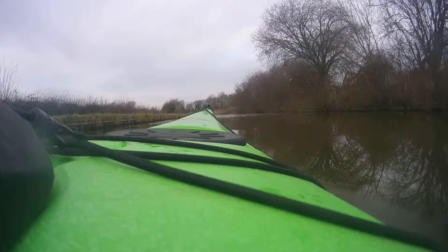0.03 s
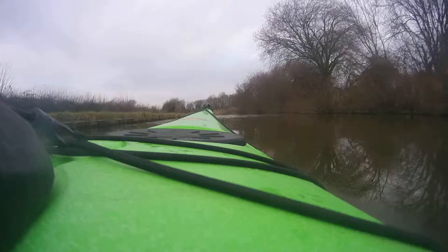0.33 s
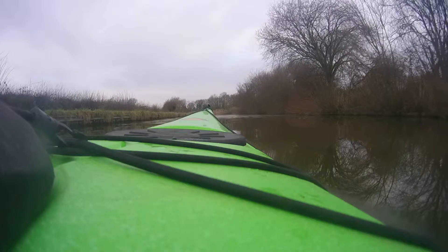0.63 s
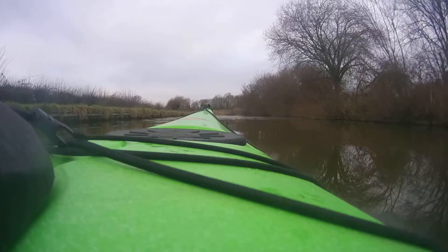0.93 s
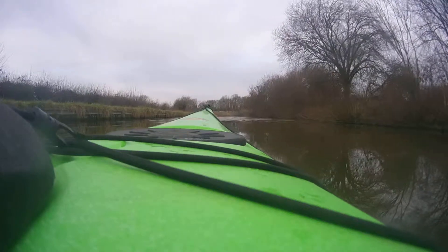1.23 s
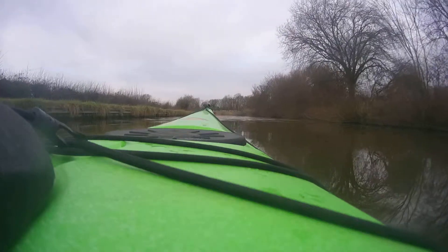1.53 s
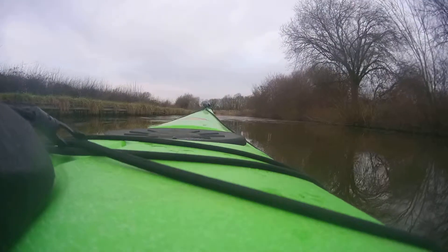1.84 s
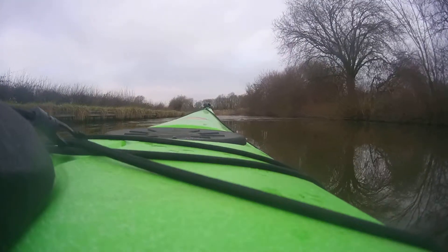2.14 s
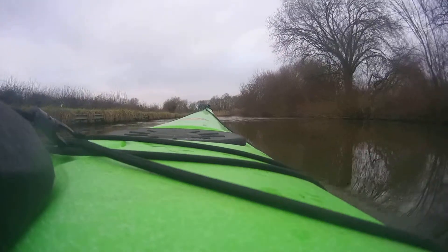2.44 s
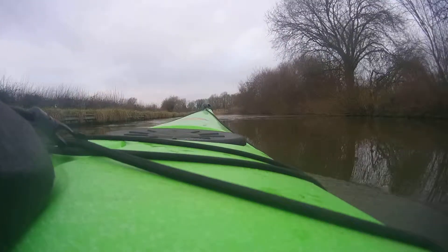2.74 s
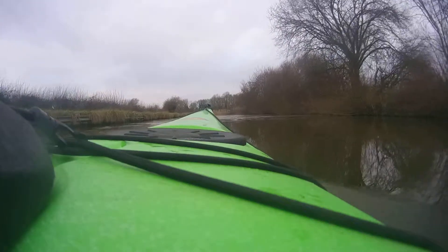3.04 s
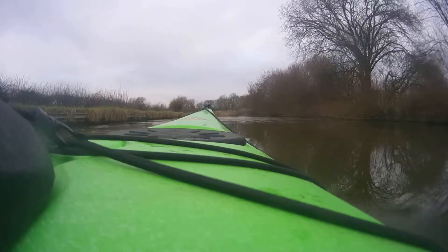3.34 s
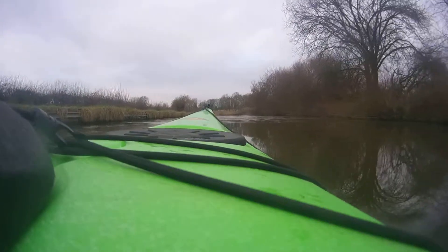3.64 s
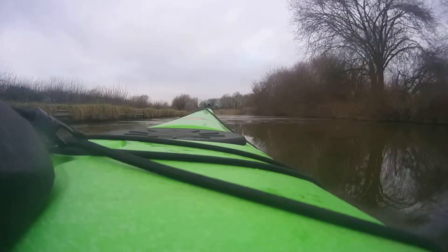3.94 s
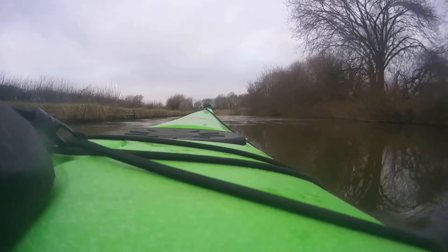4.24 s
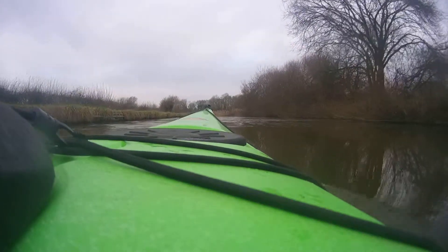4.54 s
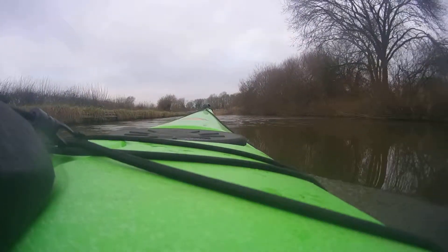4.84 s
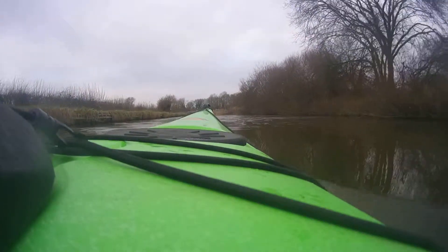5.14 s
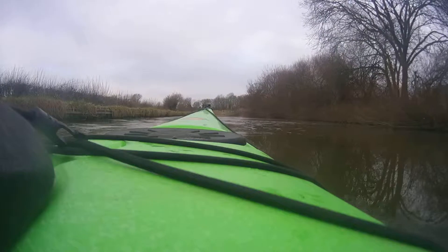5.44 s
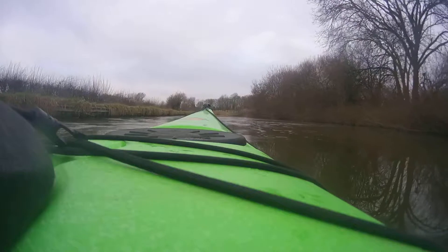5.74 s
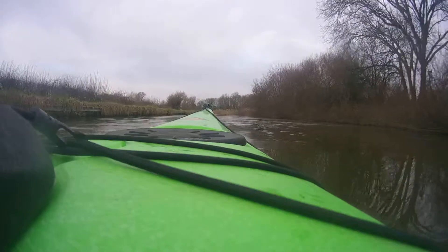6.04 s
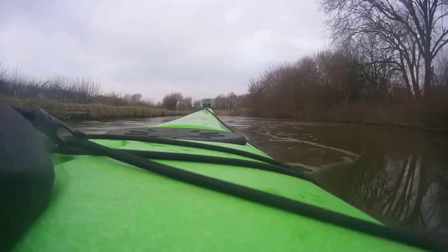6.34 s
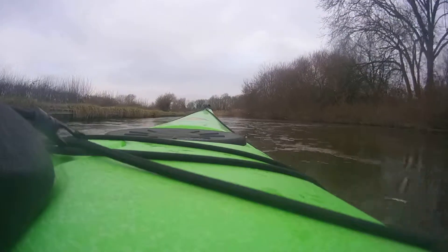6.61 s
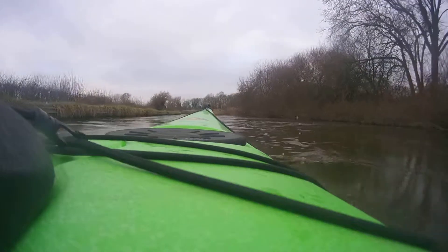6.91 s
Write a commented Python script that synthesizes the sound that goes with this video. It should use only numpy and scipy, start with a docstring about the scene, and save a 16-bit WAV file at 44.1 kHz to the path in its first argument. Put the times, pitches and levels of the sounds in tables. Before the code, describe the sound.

Gentle paddle strokes swish and drip on a calm river until thin ice cracks and crunches against a hollow plastic kayak hull.

```python
"""A calm river, heard close and dry from a small camera on the deck of a plastic kayak.
Water ripples and fizzes along the gliding hull. Drops tick on the surface, trapped air pockets ring,
and five paddle strokes splash in, gurgle and drip. Just after six seconds the bow runs into thin ice:
the sheet snaps crack after crack, shards crunch along the sides and the hollow hull drums."""
import sys
import numpy as np
from scipy import signal
from scipy.fft import rfft, irfft
from scipy.io import wavfile
from scipy.ndimage import uniform_filter1d, minimum_filter1d

SR = 44100
rng = np.random.default_rng(int(sys.argv[2]) if len(sys.argv) > 2 else 0)


def to_wav(sig):
    """Store sig (one row per channel, or 1-D mono) as 16-bit WAV at the path in sys.argv[1].

    Samples outside -1..1 are clipped; the rate is SR.
    """
    pcm = np.clip(np.atleast_2d(sig), -1, 1) * 32767
    pcm = np.round(pcm).astype(np.int16)
    wavfile.write(sys.argv[1], SR, pcm.T)  # frames by channels


N = 311787
TIME = np.arange(N) / SR
CRACK_S, EDGE_HZ = 0.003, 8600   # time a break takes to swell; its brittle top edge lies above this pitch

# Paddle strokes, near side and far side in turn. Each row: blade entry in seconds, catch level in dB,
# catch length in seconds, level of the closing hollow in dB, pull length in seconds, release level in dB.
PADDLE_STROKES = [(1.235, -35.5, 0.089, -41, .155, -30), (2.446, -46, 0.15, -45.5, 0.18, -46),
                  (3.508, -37.5, 0.082, -42, 0.087, -35.5), (4.597, -39.5, 0.13, -48, 0.22, -44),
                  (5.688, -33, 0.19, -39.5, .19, -35)]
# The colour of fine spray. Each row: frequency in Hz, relative level in dB.
SPRAY_SPECTRUM = [(200, -28), (1200, 3), (2500, -6), (4500, -1), (7000, 1.5), (9000, -10), (10300, -2.5),
                  (13000, -8), (15500, -13)]
# The ice sheet snapping. Each row: start in seconds, level in dB, pitch in Hz,
# crumbling time of the broken edge in seconds, relative level of the brittle top edge in dB.
ICE_CRACKS = [(6.262, -15, 2960, 0.0026, -7.5), (6.275, -15.5, 1900, 0.002, -2.0),
              (6.283, -15.5, 3000, 0.004, 1), (6.297, -15.5, 3000, 0.0098, -2.0),
              (6.321, -17.5, 4500, 0.0065, 0.0), (6.331, -7, 4500, 0.0076, -1.0),
              (6.351, -15.5, 4540, 0.003, -2.0), (6.367, -9.5, 3560, 0.0065, -6.0),
              (6.374, -14, 2000, 0.003, -6.0), (6.392, -10.5, 3000, 0.004, -9.0),
              (6.403, -15, 6450, 0.0085, -1), (6.415, -5, 1790, 0.0067, -7.0),
              (6.434, -18.5, 1000, 0.007, 0.0), (6.4492, -7, 3600, 0.0037, -5),
              (6.458, -13.5, 6500, 0.0036, -6), (6.474, -9, 2600, 0.005, -6.0),
              (6.487, -14.0, 6400, 0.003, -11), (6.497, -12.5, 6200, 0.003, -11),
              (6.512, -11, 1800, 0.018, -11), (6.531, -10, 1900, 0.0055, -7),
              (6.54, -13.5, 2400, 0.0062, -2), (6.559, -12.5, 3600, 0.0025, -8),
              (6.593, -6, 4300, 0.0073, -3), (6.6173, -7, 4070, 0.0044, -5.0),
              (6.638, -12.5, 3500, 0.011, 4.0), (6.657, -18.5, 7100, 0.002, -8.0),
              (6.684, -3, 4640, 0.0078, -2), (6.701, -6, 2970, 0.009, -1), (6.715, -14, 3200, 0.007, 0.0),
              (6.726, -9.5, 4230, 0.0083, 1), (6.737, -22, 3000, 0.005, 3.0), (6.752, -14, 1650, 0.01, -3),
              (6.767, -13.5, 3500, 0.0062, 3), (6.786, -14.5, 1500, 0.005, -2.0),
              (6.8, -5, 3400, 0.0027, -10), (6.8253, -9, 2590, 0.011, -8.0), (6.851, -6.5, 3040, 0.011, -9),
              (6.889, -7, 3040, 0.0085, -4), (6.899, -10, 3000, 0.0078, 3), (6.908, -16, 2000, 0.0087, 14),
              (6.916, -12.0, 2380, 0.0082, 4), (6.9468, -10.5, 2600, 0.003, -2.0),
              (6.958, -8, 6540, 0.004, 0), (6.963, -11, 6500, 0.0056, 2.0), (6.979, -13.5, 6800, 0.004, -4),
              (6.985, -11.5, 1900, 0.011, -1.0), (7.026, -12.5, 3300, 0.005, 0.0),
              (7.06, -8.5, 2440, 0.012, -11)]


def from_db(db):
    """Decibels to gain."""
    return 10 ** (np.asarray(db) / 20)


def unit_rms(x):
    """Scale to unit power."""
    return x / np.sqrt(np.mean(x ** 2) + 1e-20)


def in_time(rows):
    """Join rows of seconds and value into a curve over the whole scene."""
    return np.interp(TIME, *np.transpose(rows))


def add(out, s, sound):
    """Mix a short sound in at s seconds."""
    room = out[int(s * SR):][:len(sound)]
    room += sound[:len(room)]


def drift(rate_hz):
    """A smooth random wander of unit power, mostly slower than rate_hz."""
    step, settle = 40, 2000
    pole = np.exp(-2 * np.pi * rate_hz * step / SR)
    noise = rng.standard_normal(N // step + settle + 2)
    slow = signal.lfilter([1], [1, -2 * pole, pole * pole], noise)[settle:]
    return np.interp(np.arange(N) / step, np.arange(len(slow)), unit_rms(slow))


def cut(x, hz, kind, order=2):
    """Butterworth filter."""
    return signal.sosfilt(signal.butter(order, np.minimum(hz, SR / 2 - 1), kind, fs=SR, output="sos"), x)


def resonate(x, hz, width_hz):
    """A resonance with gain 1 at its peak."""
    r = np.exp(-np.pi * width_hz / SR)
    feedback = [1, -2 * r * np.cos(2 * np.pi * hz / SR), r * r]
    return signal.lfilter(np.array([1, 0, -1]) * (1 - r * r) / 2, feedback, x + 1e-18)


def colour(x, spectrum, size=4096):
    """Minimum-phase filter with the given spectrum; white noise keeps its power."""
    hz, db = np.transpose(spectrum)
    grid = np.log(np.fft.rfftfreq(size, 1 / SR) + 1)
    cepstrum = irfft(np.log(from_db(np.interp(grid, np.log(hz), db))))
    cepstrum[1:size // 2] *= 2
    cepstrum[size // 2 + 1:] = 0
    response = irfft(np.exp(rfft(cepstrum)))
    return signal.fftconvolve(x, response / np.linalg.norm(response))[:N]


def grains(per_s, spread_db):
    """Random clicks, many small and a few large."""
    sizes = from_db(spread_db * np.minimum(rng.exponential(1, N), 4.5)) * rng.choice([-1, 1], N)
    return unit_rms(sizes * (rng.random(N) < per_s / SR))


def pings(per_s, spread_db, q, top_hz=7000, count=28):
    """A swarm of bubbles or ice plates, each ringing briefly at the pitch of its size."""
    clicks, size_class = grains(per_s, spread_db), rng.integers(0, count, N)
    pitches = np.geomspace(250, top_hz, count)
    return unit_rms(sum(resonate(clicks * (size_class == k), hz, hz / q) for k, hz in enumerate(pitches)))


def blip(hz, glide, ring_s):
    """A sine that builds within a cycle, holds and dies; at first it glides by `glide` octaves a ring_s."""
    age = np.arange(int(4 * ring_s * SR)) / SR / ring_s
    turns = np.cumsum(hz * 2 ** (glide * np.minimum(age, 2))) / SR
    onset = 1 - np.exp(-(turns / 0.56) ** 2)
    decay = np.exp(-(age / 3) ** 4) / (1 + age ** 2.8)
    return np.sin(2 * np.pi * turns) * onset * decay


def hull_wash(wake_db=-39, wake_s=0.12):
    """Water runs along the hull with small bubbles and a fine fizz; it rises in each stroke's wake."""
    # The wash of the gliding hull. Each row: time in seconds, level in dB.
    glide_levels = [(0.2, -45.5), (0.85, -39), (1.8, -39), (2.35, -40.5), (2.75, -39), (3.3, -39.5),
                    (3.9, -39.5), (4.15, -40.5), (4.5, -40), (5.2, -40.5), (6.1, -37.5)]
    # The colour of rippling water. Each row: frequency in Hz, relative level in dB.
    ripple_spectrum = [(18, -58), (30, -26), (70, -17), (300, -8.5), (596, -2.5), (919, -0.5), (1320, -2.5),
                       (2450, -6.5), (3220, -8), (4640, -12.5), (7000, -23), (9100, -26), (15400, -120)]
    power = from_db(in_time(glide_levels)) ** 2
    first_catch_db = PADDLE_STROKES[0][1]
    for s, catch_db, *_ in PADDLE_STROKES:
        age = np.maximum(TIME - s, 0) / wake_s
        wake = from_db(wake_db + 0.67 * (catch_db - first_catch_db))   # harder stroke, bigger wake
        power += (wake * age * np.exp(1 - age)) ** 2
    water_db = 10 * np.log10(power)
    wash = 0.9 * rng.standard_normal(N) + 0.44 * pings(per_s=2500, spread_db=2, q=10.5)
    ripple = cut(colour(wash, ripple_spectrum), 4230, "low", order=1)
    ripple *= from_db(water_db + 1 + 1.54 * drift(21))
    droplets = 0.5 * grains(per_s=1600, spread_db=4.5) + 0.74 * rng.standard_normal(N)
    fizz = colour(droplets, SPRAY_SPECTRUM) * from_db(water_db - 4.5 + 1.9 * drift(21))
    return ripple + fizz


def wet_tick(hz, width):
    """A drop slaps down with a short tick, broad or ringing, scaled to a peak of 1."""
    t = np.arange(SR // 40) / SR
    envelope = (1 - np.exp(-t / 0.0003)) * (np.exp(-t / 0.0011) + 0.06 * np.exp(-t / 0.008))
    slap = rng.standard_normal(len(t)) * envelope
    tick = cut(resonate(slap, hz, width * hz), 0.25 * hz, "high")
    tick = cut(tick, (0.61 + width) * hz, "low")   # water softens the contact
    return tick / np.abs(tick).max()


def plop(hz, glide, splatter_db=-21):
    """An air pocket rings, longer when it is large and low, inside a short wet splatter."""
    ring_s = 0.0073 * (1000 / hz) ** 0.34
    tone = blip(hz, glide, ring_s)
    age = np.arange(len(tone)) / SR / ring_s
    band = resonate(rng.standard_normal(SR // 4), hz, 0.8 * hz)
    splatter = unit_rms(cut(band, 1.4 * hz, "low", order=3))[:len(tone)]
    swell = age * np.exp(1 - age) * np.exp(-(age / 3) ** 4)
    return tone + from_db(splatter_db) * splatter * swell


def drips(per_stroke=4, drip_for_s=0.47, drip_db=-27.5, drip_hz=4500):
    """Drops slap and trap air; after each stroke the raised blade sheds a few more."""
    # The loudest slaps of water on blade and deck. Each row: start in seconds, level in dB,
    # pitch in Hz, bandwidth as a share of the pitch.
    slaps = [(0.772, -24.5, 5000, .8), (0.851, -21.5, 3040, .45), (1.2083, -4, 1320, 0.52),
             (1.2102, -9.5, 2110, 0.71), (1.2108, -11, 3230, 1.2), (1.2275, -11, 1450, 0.75),
             (1.252, -16, 2650, 0.33), (1.2815, -22, 7000, .25), (1.299, -27, 3300, 0.57),
             (1.319, -25, 4600, 0.37), (1.3235, -25, 3700, 1), (1.415, -16, 2820, 0.35),
             (1.463, -21, 2100, 0.64), (1.502, -20.5, 6200, 0.16), (1.659, -21, 6240, 0.27),
             (1.849, -14, 6750, 0.25), (2.551, -25, 6000, 0.45), (2.636, -26, 3900, .4),
             (2.765, -23.5, 7000, 1.6), (2.859, -25, 4500, .8), (2.942, -18, 6200, 0.19),
             (2.955, -20, 5500, .3), (2.990, -20.5, 6340, 0.61), (3.112, -21, 5800, 0.24),
             (3.122, -15, 4700, .5), (3.138, -20.5, 5200, .3), (3.1955, -14, 4080, 1.05),
             (3.4535, -16, 3020, 0.27), (3.522, -20, 5500, 0.53), (3.665, -20, 4400, .4),
             (3.704, -16.5, 5560, 0.24), (3.986, -16.5, 4240, 1.15), (4.2255, -20.5, 4950, 0.8),
             (4.3605, -20, 404, 0.74), (4.3605, -17, 3500, 1.4), (5.637, -23, 3500, .4),
             (5.763, -16, 4330, 0.59), (5.788, -16.5, 4800, .6), (5.936, -13.5, 5030, 1.05)]
    # Air pockets trapped by drops and blades. Each row: start in seconds, level in dB,
    # pitch in Hz, glide in octaves per ring time.
    air_pockets = [(1.03, -19, 2200, -0.09), (1.156, -29, 940, 0.16), (1.228, -26, 3200, 0.04),
                   (1.236, -24, 1104, -0.6), (1.246, -30, 750, 0), (1.271, -28, 2420, 0.3),
                   (1.324, -28, 1120, -0.3), (2.972, -33, 2870, -0.17), (3.121, -26.5, 3430, -0.16),
                   (3.143, -30, 1940, 0.06), (3.160, -32, 1450, 0.25), (3.479, -31, 760, 0),
                   (3.513, -35, 1080, 0.37), (3.543, -26.5, 880, 0.62), (3.549, -27, 1386, 0.45),
                   (3.617, -28.5, 794, 0), (3.651, -35, 950, 0), (3.663, -27, 860, 0.04),
                   (3.718, -28, 1550, 0), (4.228, -32, 1055, -0.17), (4.248, -29, 700, -0.38),
                   (4.304, -26.5, 2280, -0.23), (4.364, -29, 150, 0.41), (4.442, -27, 850, 0.08),
                   (4.836, -27, 1350, -0.07), (5.174, -31, 3080, 0.1), (5.407, -27, 1770, 0.2),
                   (5.4224, -27, 1484, 0.1), (5.431, -13.5, 1214, -0.23), (5.4321, -20.5, 1330, 0.46),
                   (5.685, -32, 375, -0.15), (5.691, -27, 1700, -0.24), (5.737, -26, 1060, -0.15),
                   (5.782, -25.5, 1370, 0.04)]
    out, blade_drops = np.zeros(N), []
    for s, *_, pull_s, _ in PADDLE_STROKES:
        for when, size in rng.random((per_stroke, 2)):
            blade_drops.append((s + pull_s + when * drip_for_s, drip_db, drip_hz * 2 ** (0.5 - size), 0.4))
    for s, db, hz, glide in air_pockets:
        add(out, s, from_db(db + 3.5) * plop(hz, glide))
    for s, db, hz, width in slaps + blade_drops:
        add(out, s, from_db(db - 0.2) * wet_tick(hz, width))
    return cut(out, 105, "high")


def blade_splashes(catch_hz=1046, hollow_hz=339, release_hz=1500, spray_db=-12.5):
    """Three splash rows a stroke: the blade gulps in, its hollow closes low, it lifts out brighter."""
    hollow_s, release_s = 0.079, 0.1
    rows = []
    for s, catch_db, catch_s, hollow_db, pull_s, release_db in PADDLE_STROKES:
        rows += [(s, catch_db, catch_s, catch_hz, spray_db),
                 (s, hollow_db, hollow_s, hollow_hz, spray_db),
                 (s + pull_s, release_db, release_s, release_hz, spray_db)]
    return rows


def splashes(bubble_count=70):
    """Each splash swells and sinks: froth, flying spray and bubbles that chirp upward as they surface."""
    # Water surging round the blade and lapping at the hull. Each row: start in seconds, level in dB,
    # length in seconds, gurgle pitch in Hz, relative spray level in dB.
    sloshes = [(1.133, -33, 0.072, 954, -13), (1.226, -33, 0.024, 645, -22), (1.24, -35, 0.029, 2700, -18),
               (1.3, -44, 0.027, 210, -25), (1.404, -29, 0.015, 2680, -11), (1.47, -37, 0.019, 1500, -3),
               (2.458, -38, 0.052, 676, -31), (2.532, -39, 0.028, 2290, -23),
               (2.658, -36.5, 0.013, 2190, -16), (2.795, -46, 0.044, 1500, -12),
               (3.131, -36.5, 0.11, 2300, -6.5), (3.429, -36, 0.23, 690, -15.5),
               (3.66, -41, 0.014, 1500, -3), (3.705, -35.5, 0.053, 2900, -22),
               (4.228, -37, 0.037, 990, -11), (4.365, -35, 0.044, 400, -7.5), (4.424, -37, 0.052, 700, -24),
               (5.409, -35.5, 0.054, 4500, -8), (5.462, -36, 0.056, 1500, -15),
               (5.491, -36.5, 0.018, 230, -21), (5.68, -35, 0.054, 1270, -25)]
    out, t = np.zeros(N), np.arange(SR // 2) / SR
    froth = pings(per_s=2000, spread_db=2.5, q=24) * from_db(0.9 * drift(89))
    spray = colour(grains(per_s=2500, spread_db=2.7), SPRAY_SPECTRUM) * from_db(2.8 * drift(70))
    for s, db, length_s, hz, spray_db in blade_splashes() + sloshes:
        part = slice(int(s * SR), int(s * SR) + len(t))
        gurgle = unit_rms(cut(resonate(froth[part], hz, 0.83 * hz), 310, "high", order=3))
        chirps = np.zeros(len(t))
        for when, size, strength, rise in rng.random((bubble_count, 4)):
            pitch = hz * 2 ** (1.8 * size - 0.8)
            add(chirps, when * t[-1], (0.5 + strength) * blip(pitch, 0.16 * rise, ring_s=6.5 / pitch))
        age = t / length_s
        swell = (1 - np.exp(-63 * age)) / (1 + age ** 6.1)
        water = 0.85 * gurgle + 0.52 * unit_rms(chirps) + from_db(spray_db) * spray[part]
        add(out, s, from_db(db) * swell * water)
    return out


def snaps(gap_s=0.008):
    """Yield every crack and up to two more snaps, mostly weaker, while its edge crumbles."""
    for s, db, hz, crumble_s, edge_db in ICE_CRACKS:
        yield s, db, hz, edge_db
        for k, (jitter, strength, size) in enumerate(rng.uniform(-1.3, 1, (2, 3)), start=1):
            if gap_s * k < crumble_s:
                snap_s = s + gap_s * (k + 0.26 * jitter)
                yield snap_s, db - 4.5 + 4 * strength, hz * 2 ** (0.5 * size), edge_db


def fractures(overload_hz=13000):
    """A crack is a tight burst of tiny breaks; the piece that snaps sets its pitch and brittleness."""
    body, edge, overload_hiss = np.zeros((3, N))
    t = np.arange(SR // 30) / SR
    age = t / CRACK_S
    swell = np.exp(-((age - 1.05) / 0.9) ** 2) + 0.02 * (1 - np.exp(-age)) * np.exp(-t / 0.006)
    noise = rng.standard_normal(N + SR)
    for s, db, hz, edge_db in snaps():
        breaks = noise[int(s * SR):][:len(t)]
        burst = from_db(db) * swell * (0.4 * breaks + 0.95 * resonate(breaks, hz, 0.48 * hz))
        add(body, s, burst)
        add(edge, s, from_db(edge_db) * burst)
        # the loudest cracks overload the recorder, adding a brief high hiss
        add(overload_hiss, s, from_db(2 * db + edge_db - 2) * swell)
    snap = cut(body, EDGE_HZ, "low", order=3) + cut(edge, EDGE_HZ, "high", order=3)
    snap += cut(overload_hiss * rng.standard_normal(N), overload_hz, "high", order=3)
    # bending waves in the sheet carry the treble faster, so the lows arrive late
    out = cut(snap, 2930, "high")
    add(out, 0.00094, cut(snap, 2500, "low"))
    return out


def crumbling():
    """Strength of the shards a crack sheds: it rises with the break, holds as the edge crumbles, drops."""
    power, t = np.zeros(N), np.arange(SR // 5) / SR
    for s, db, _, crumble_s, _ in ICE_CRACKS:
        shed = np.minimum(t / CRACK_S, 1) / (1 + (t / crumble_s) ** 4)
        add(power, s, (from_db(0.5 * db - 12) * shed) ** 2)   # bigger cracks shed more
    return np.sqrt(power)


def deck_ring(x, weak_count=48):
    """Sound carried through the plastic deck picks up a few strong modes and many weak, close ones."""
    # The strong modes of the deck. Each row: frequency in Hz, relative level in dB.
    deck_modes = [(1368, -10), (1460, -12), (1644, -12), (2338, -5), (3741, -14), (3870, -7), (5055, -5),
                  (5860, -8), (6196, -11), (6493, -1), (6936, -2), (7031, -1), (7104, 2), (7221, 8),
                  (7348, 1)]
    detune, polarity = rng.random((weak_count, 2)).T
    pitches = np.geomspace(1000, 11000, weak_count) * (1 + 0.022 * detune)
    weak = sum(resonate(x, hz, 30 + hz / 300) * sign for hz, sign in zip(pitches, np.sign(polarity - 0.5)))
    strong = sum(resonate(x, hz, width_hz=31) * from_db(db + 2) for hz, db in deck_modes)
    return x + 0.18 * weak + strong


def hull_drum(crush, crumble, cracks, grind):
    """The hollow hull booms as shards, cracks and grinding shake it and floes knock against it."""
    # The modes of the hull shell. Each row: frequency in Hz, width in Hz, relative level in dB.
    hull_modes = [(117, 38, -15.5), (290, 70, -9.5), (363, 45, -4.5), (481, 77, 4.5), (548, 30, 1)]
    # Floes striking the hull. Each row: start in seconds, level in dB, pitch in Hz, ring in seconds.
    floe_knocks = [(6.33, -22.5, 506, 0.039), (6.415, -21.5, 371, 0.031), (6.432, -23, 555, 0.014),
                   (6.515, -28, 545, 0.025), (6.597, -22, 504, .012), (6.683, -8, 60, 0.005),
                   (6.686, -14, 200, 0.004), (6.84, -26, 176, 0.016), (6.894, -8.5, 378, 0.0066),
                   (6.896, -27.5, 123, 0.023)]
    load = np.hypot(crush * from_db(-9), crumble * from_db(-10))
    push = grains(per_s=2500, spread_db=2.5) * load + 0.27 * cracks + from_db(-6.5) * grind
    drum = sum(resonate(push, hz, width) * from_db(db + 18) for hz, width, db in hull_modes)
    for s, db, hz, ring_s in floe_knocks:
        add(drum, s, from_db(db) * blip(hz, 0, ring_s))
    return drum


def splinters(rise_s=0.0038):
    """Tiny slivers break off the edge with a short, glassy tinkle."""
    # Slivers of ice. Each row: start in seconds, level in dB, pitch in Hz.
    slivers = [(6.336, -25, 12000), (6.435, -22, 11400), (6.716, -26, 12800), (6.862, -24, 10900),
               (6.9215, -22, 11600)]
    out, age = np.zeros(N), np.arange(SR // 20) / SR / rise_s
    grit = grains(per_s=10000, spread_db=4.5)
    for s, db, hz in slivers:
        ring = resonate(grit[int(s * SR):][:len(age)], hz, 0.1 * hz)
        tinkle = unit_rms(cut(ring, EDGE_HZ, "high"))
        add(out, s, from_db(db) * tinkle * age * np.exp(1 - age))
    return out


def grinding():
    """The bow rides up on a plate and grinds it under: a coarse, dull crunch that swells and stops."""
    # Plates pushed under. Each row: start in seconds, level in dB, length in seconds, pitch in Hz.
    plates = [(6.399, -24.5, 0.044, 1400), (6.511, -23, 0.033, 1760), (6.894, -23, 0.038, 1190)]
    out, t = np.zeros(N), np.arange(SR // 8) / SR
    grit = grains(per_s=3000, spread_db=3)
    for s, db, length_s, hz in plates:
        age = t / length_s
        band = resonate(grit[int(s * SR):][:len(t)], hz, width_hz=hz)
        scrape = unit_rms(cut(band, 2 * hz, "low"))
        add(out, s, from_db(db) * scrape * (1 - np.exp(-10 * age)) / (1 + age ** 6))
    return out


def breaking_ice(contact_s=6.262):
    """The bow breaks the sheet: cracks, crunching shards and clinking plates ring through the boat."""
    # Shards crushed steadily along the bow. Each row: time in seconds, level in dB.
    crush_levels = [(6.27, -26), (6.42, -21), (6.58, -20.5), (6.67, -24), (6.74, -18.5), (6.815, -21),
                    (6.87, -23.5), (6.93, -20), (7.06, -23)]
    # The colour of breaking ice. Each row: frequency in Hz, relative level in dB.
    ice_spectrum = [(300, -13), (720, -5.5), (1100, -4), (1600, -2.5), (2100, -2), (2600, -6.5),
                    (3300, -2.5), (3750, -5.5), (4400, -6), (5700, -4.5), (6550, 3), (7300, -4.5),
                    (8850, -7), (10200, -4), (15000, -22)]
    crush = from_db(in_time(crush_levels)) * np.clip((TIME - contact_s) / 0.013, 0, 1)
    crumble = crumbling()
    shards = grains(per_s=3000, spread_db=2.6) * from_db(-3.3 + 1.5 * drift(120))
    clinks = pings(per_s=1800, spread_db=2.5, q=11, top_hz=2886, count=20) * from_db(-5)
    debris = (shards + clinks) * np.hypot(crush, crumble)
    cracks, grind = fractures(), grinding()
    crunch = deck_ring(colour(cracks + debris, ice_spectrum))
    drum = hull_drum(crush, crumble, cracks, grind)
    return cut(crunch, 230, "high", order=1) + grind + drum + splinters()


def scene():
    """Open water, in mono from the deck: everything is close and dry."""
    return (hull_wash() + splashes() + drips() + breaking_ice())[None]


def limiter(x, ceiling=0.74, window=10):
    """The gain ducks for a moment around any peak above the ceiling."""
    gain = ceiling / np.maximum(np.abs(x), ceiling)
    return x * uniform_filter1d(minimum_filter1d(gain, window), window)


def record(dry, start_s=0.11, notch_hz=(7570, 8330), cutoff_hz=15350):
    """The camera's microphone opens; its sound has a deep notch, limited peaks and a steeply cut top."""
    sound = dry * np.clip((TIME - start_s) / 0.0018, 0, 1)
    sound = limiter(cut(sound, notch_hz, "bandstop", order=3))
    return signal.sosfilt(signal.ellip(10, 0.3, 80, cutoff_hz, fs=SR, output="sos"), sound)


dry = scene()
out = record(dry)
to_wav(out)
```